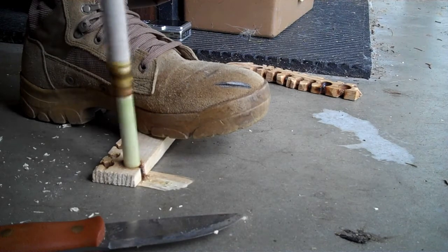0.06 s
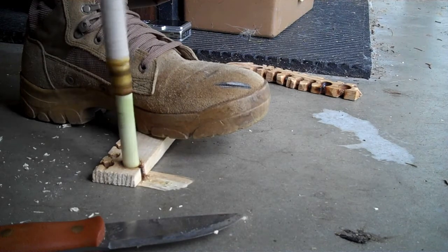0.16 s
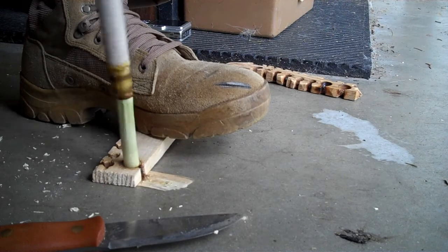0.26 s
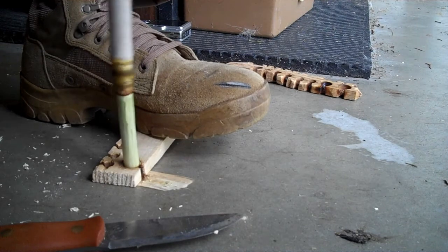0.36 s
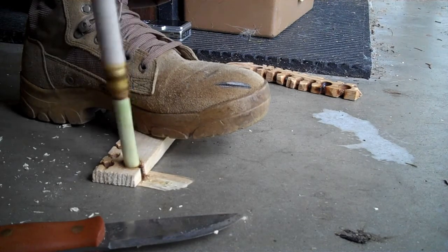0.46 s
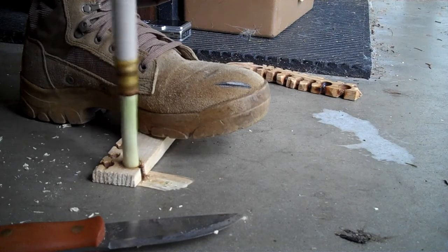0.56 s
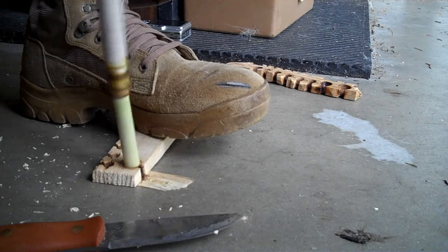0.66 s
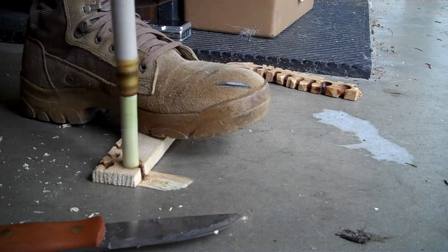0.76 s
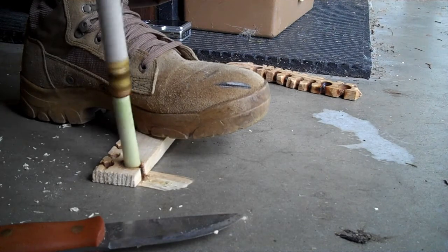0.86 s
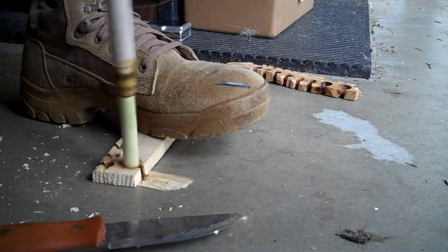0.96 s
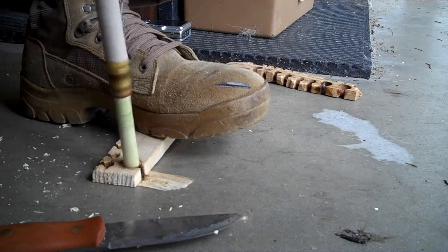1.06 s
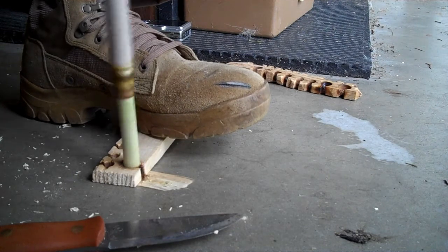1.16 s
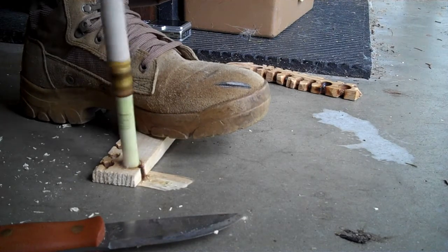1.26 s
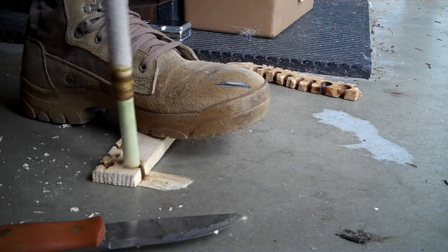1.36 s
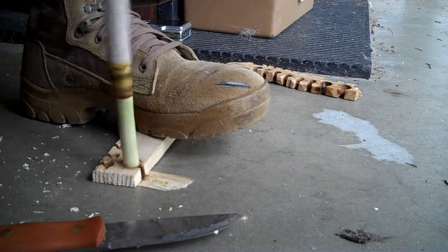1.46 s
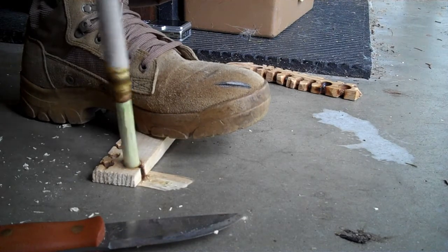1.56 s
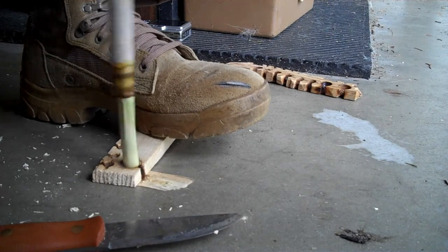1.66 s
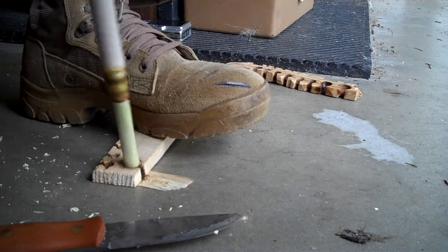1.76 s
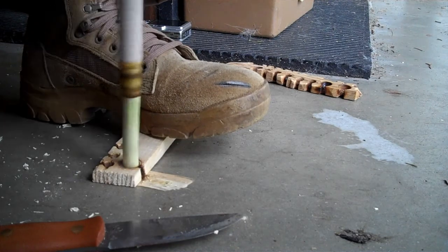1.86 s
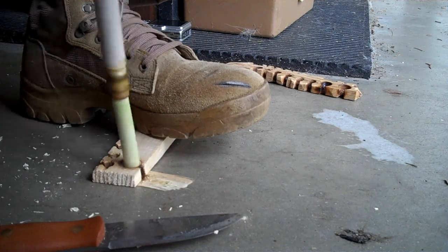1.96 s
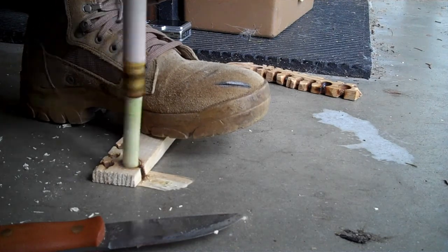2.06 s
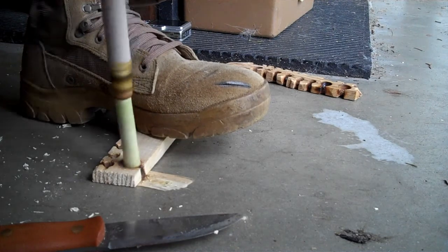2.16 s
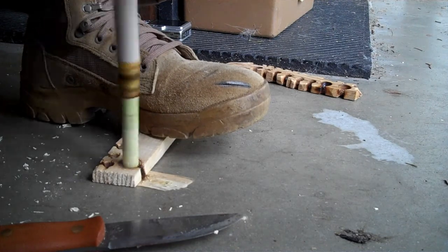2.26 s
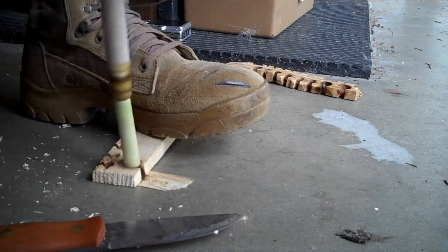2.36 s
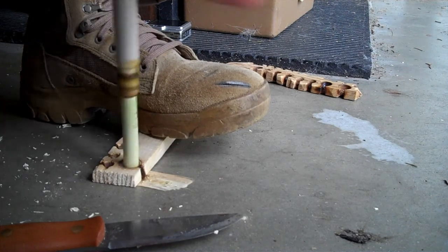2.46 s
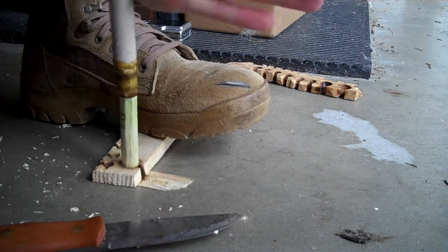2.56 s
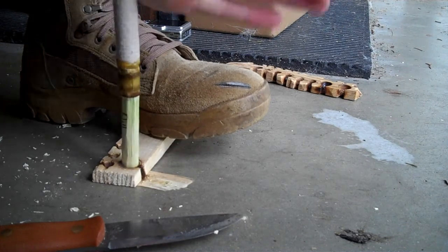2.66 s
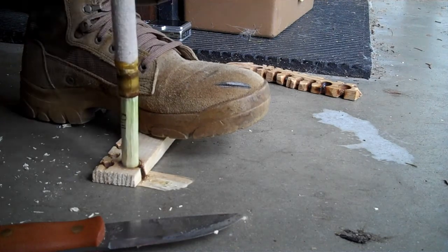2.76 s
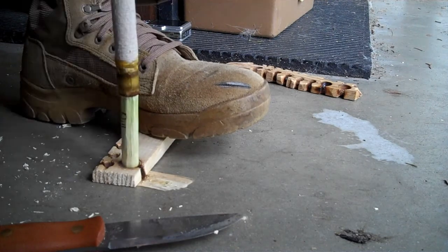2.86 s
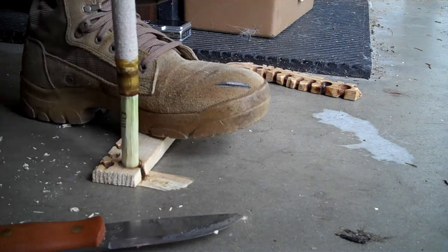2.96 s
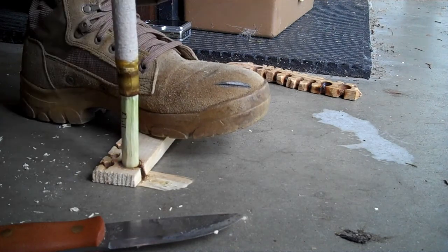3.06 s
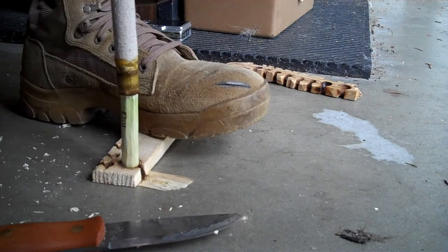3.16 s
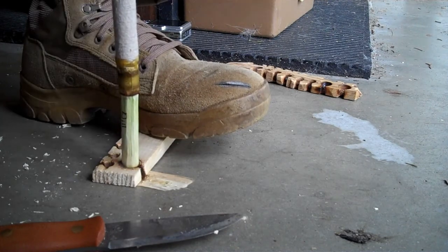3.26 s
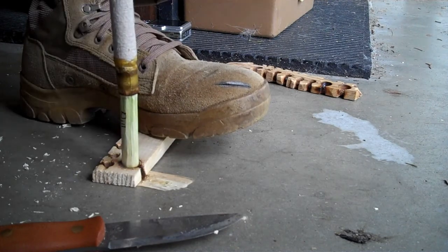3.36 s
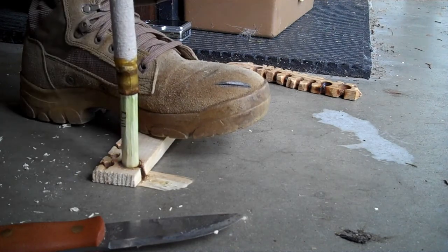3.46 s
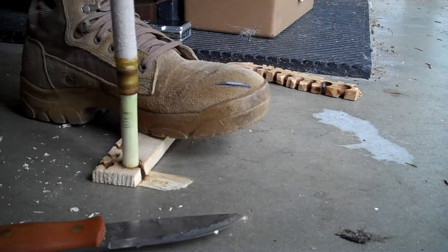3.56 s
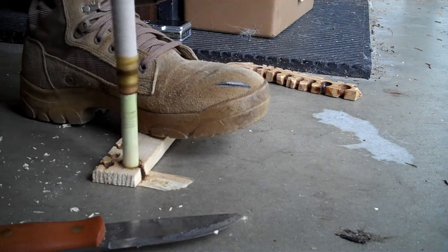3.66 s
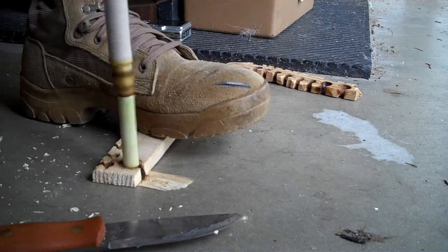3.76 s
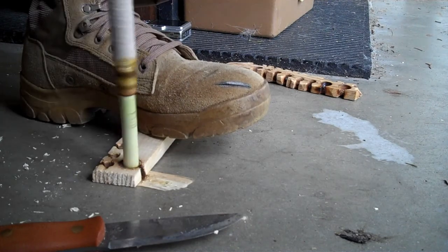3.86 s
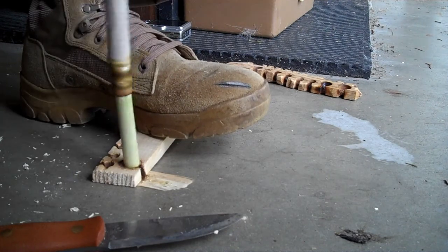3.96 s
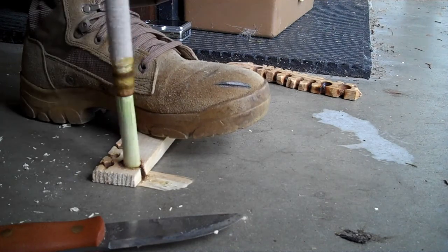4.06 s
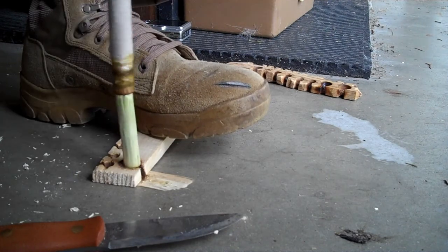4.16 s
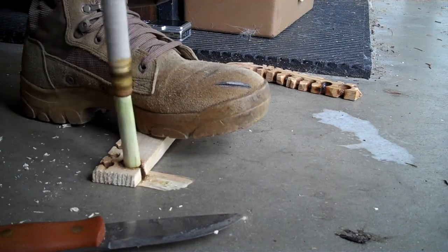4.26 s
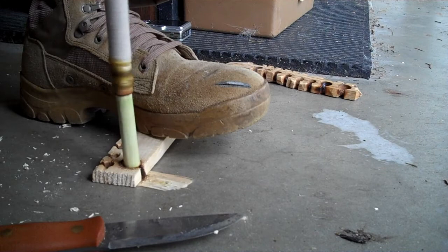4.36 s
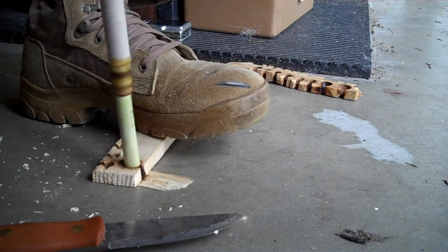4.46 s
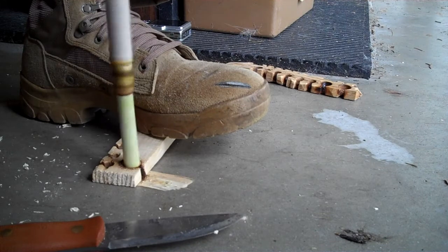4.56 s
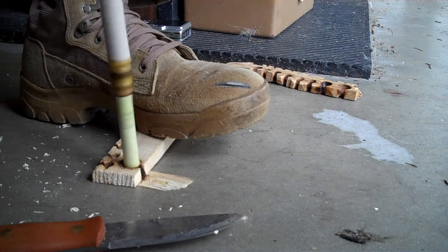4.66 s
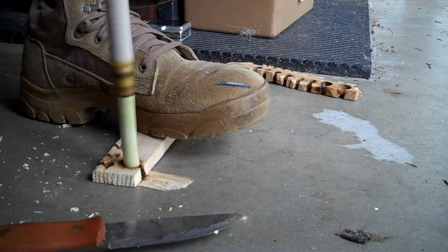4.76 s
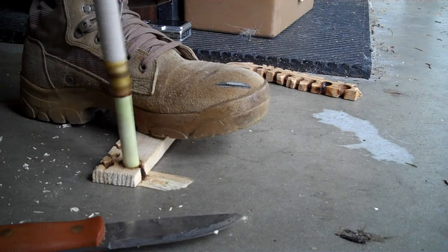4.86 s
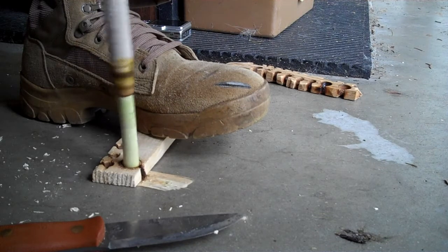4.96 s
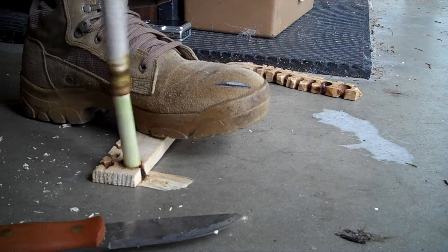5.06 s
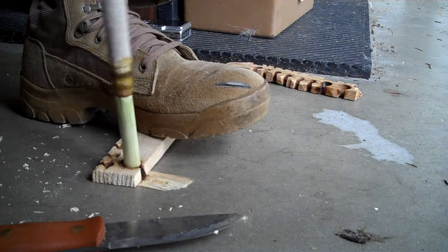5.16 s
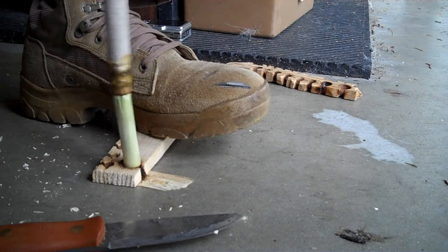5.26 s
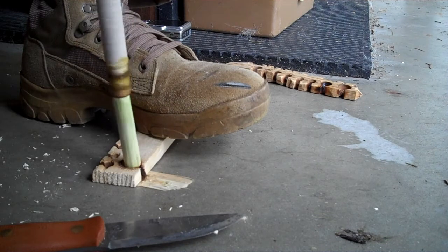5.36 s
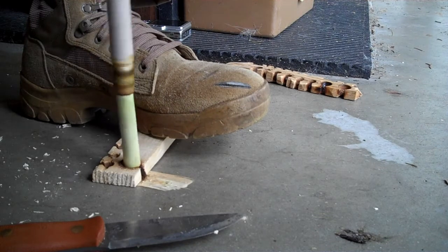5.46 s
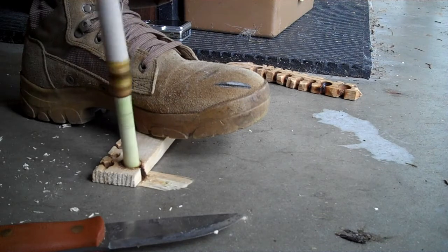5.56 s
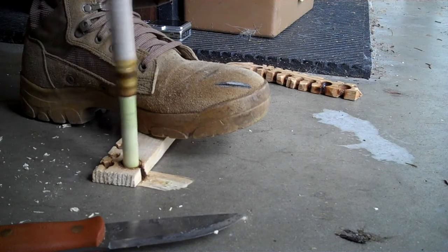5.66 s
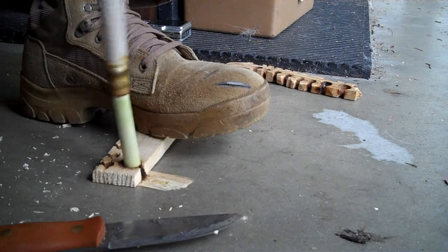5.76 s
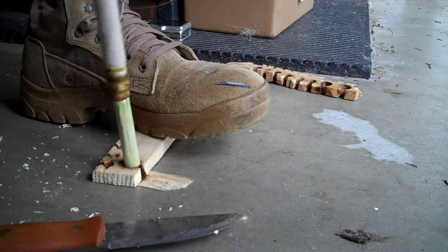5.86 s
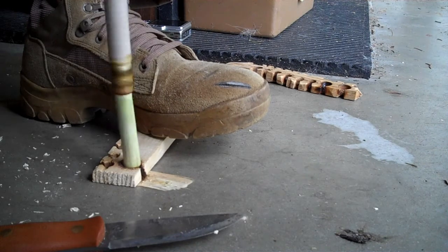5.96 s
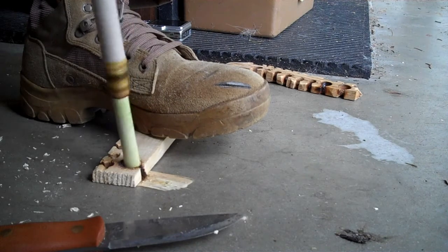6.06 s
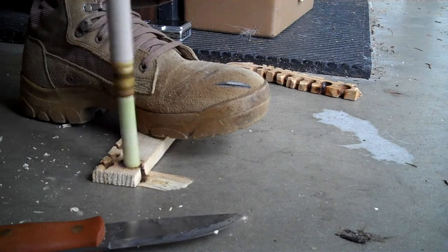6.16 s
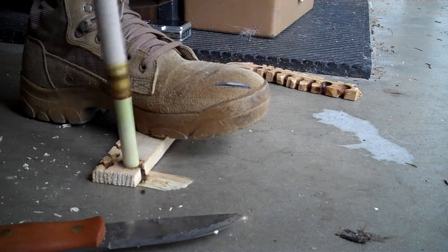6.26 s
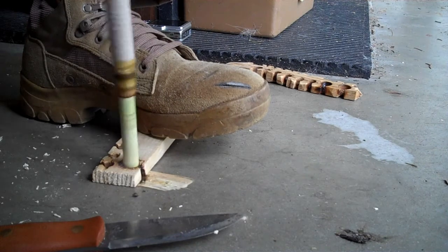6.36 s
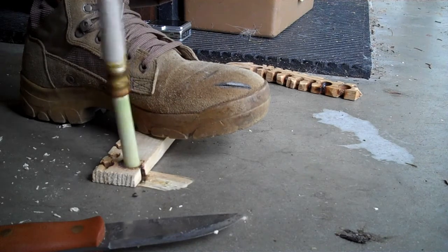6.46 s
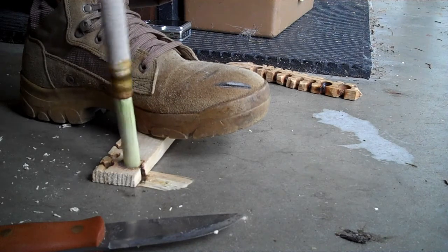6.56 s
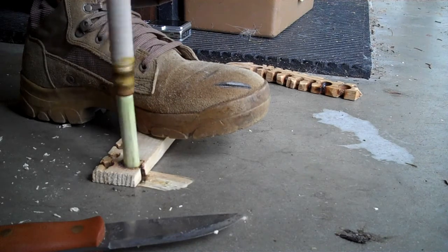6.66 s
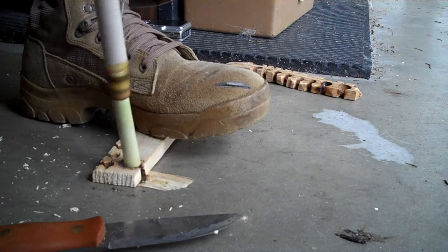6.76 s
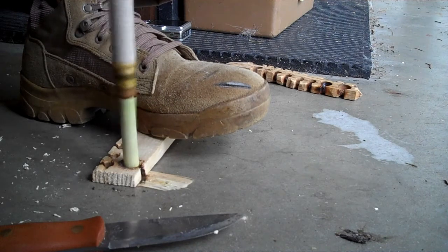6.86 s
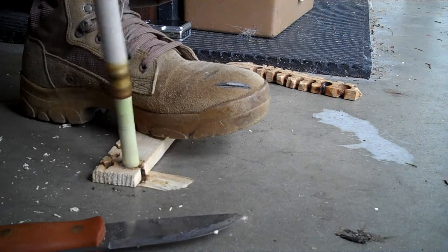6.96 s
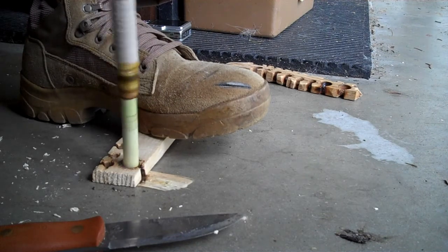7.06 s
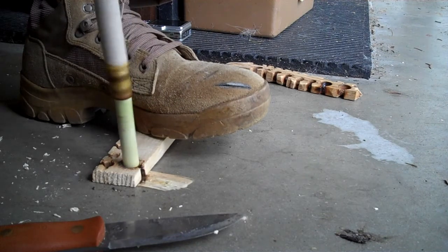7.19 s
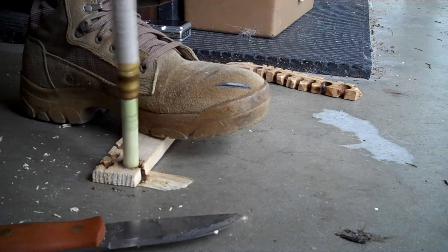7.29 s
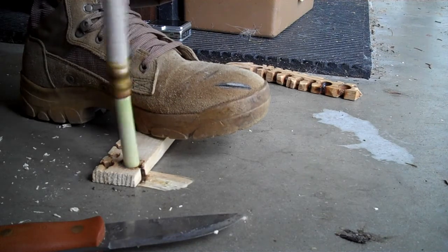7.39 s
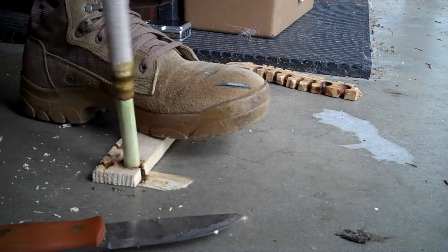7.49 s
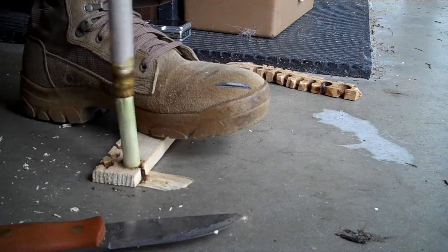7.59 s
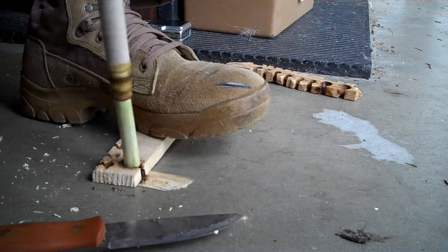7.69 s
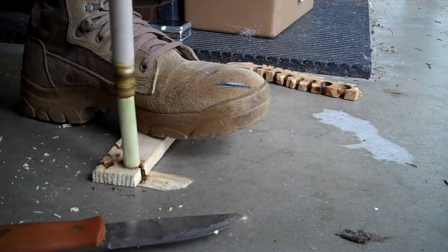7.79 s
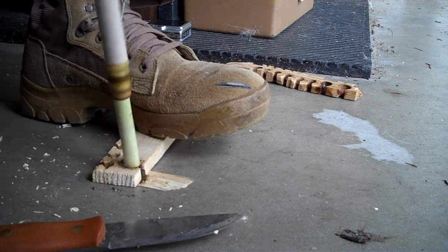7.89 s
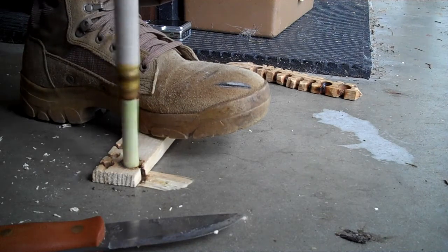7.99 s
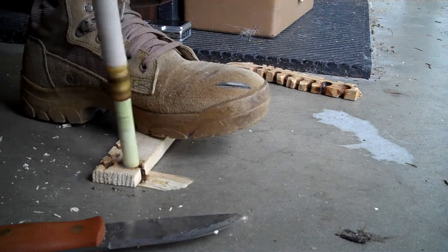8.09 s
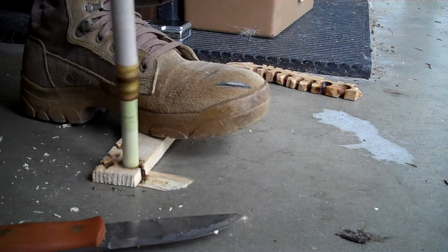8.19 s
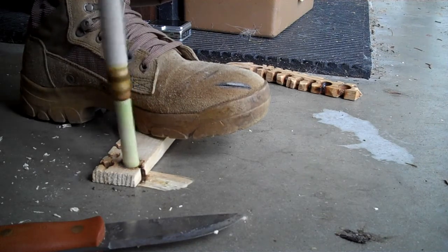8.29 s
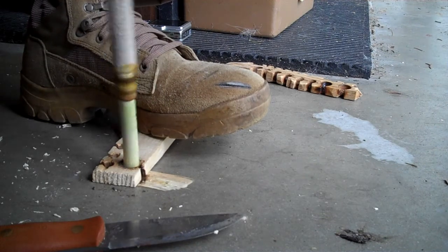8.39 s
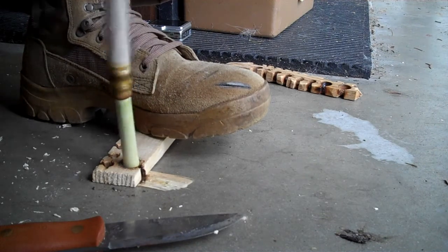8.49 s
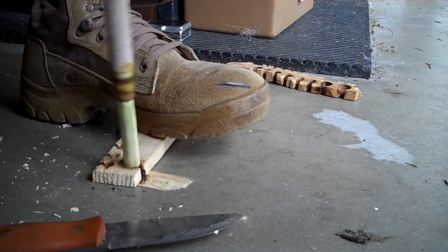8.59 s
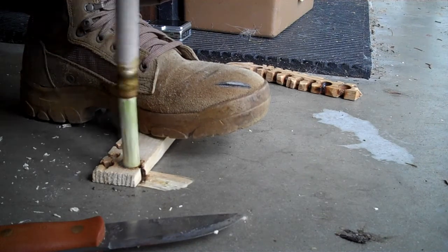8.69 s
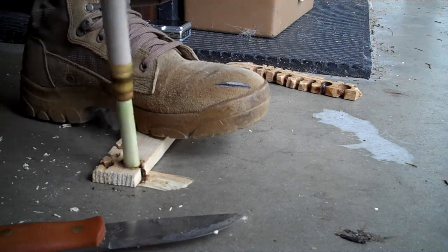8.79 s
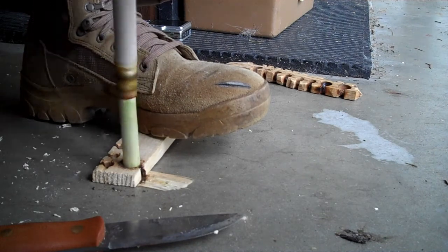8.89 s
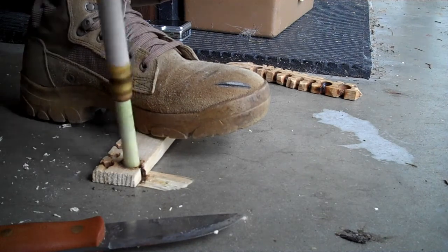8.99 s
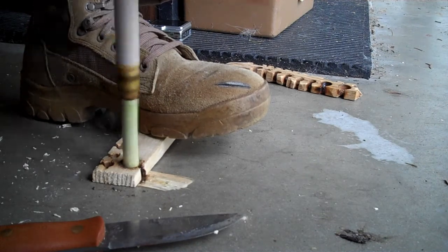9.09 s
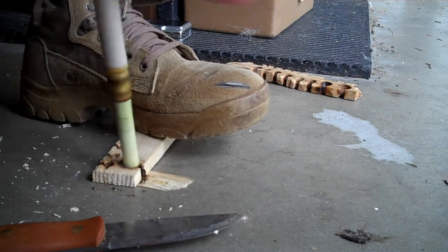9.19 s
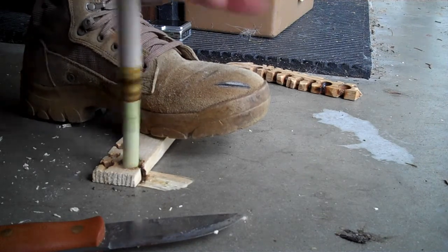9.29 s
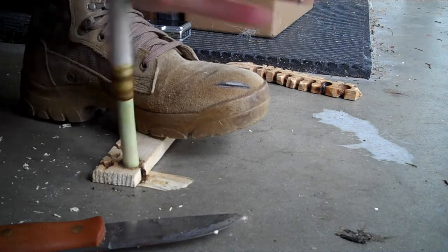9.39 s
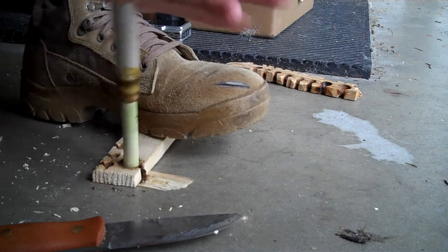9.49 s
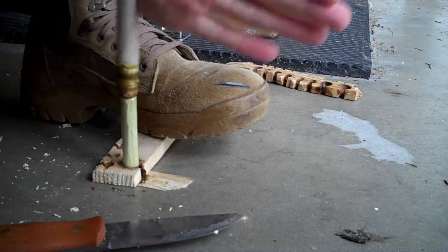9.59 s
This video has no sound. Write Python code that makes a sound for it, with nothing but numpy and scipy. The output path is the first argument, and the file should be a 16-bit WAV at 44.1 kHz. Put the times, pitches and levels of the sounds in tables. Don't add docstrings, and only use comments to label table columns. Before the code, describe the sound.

A wooden spindle rolled between palms rasps back and forth on a small board, ticking sharply, pausing once, outdoors with faint wind.

```python
import sys
import numpy as np
from scipy import signal
from scipy.fft import rfft, irfft, next_fast_len
from scipy.io import wavfile
from scipy.ndimage import uniform_filter1d

SR = 44100
rng = np.random.default_rng(int(sys.argv[2]) if len(sys.argv) > 2 else 0)


def convert_level_to_amplitude(level_db):
    exponent = np.asarray(level_db, float) / 20
    return 10 ** exponent


def wrap_up_sound(samples):
    columns = np.atleast_2d(samples).T
    tamed = np.clip(columns, -1, 1)
    steps = np.round(tamed * 32767).astype(np.int16)
    wavfile.write(sys.argv[1], SR, steps)


N = 424683
TIME = np.arange(N) / SR
PADDED = next_fast_len(N)
BIN_HZ = np.maximum(np.arange(PADDED // 2 + 1) * SR / PADDED, 1)
REST_START_S, REST_END_S = 2.58, 3.65

# t/s, bright level/dB, dull level/dB
SLIDE = [
    (2.55, -71, -60),
    (2.66, -47, -55),
    (2.8, -37.5, -43.5),
    (2.93, -37, -47),
    (2.97, -31, -43),
    (3.0, -37, -43),
    (3.08, -43, -60),
    (3.2, -51, -61),
    (3.6, -56, -49),
]
# t/s, tick peak level/dB, out stroke level/dB, back stroke level/dB
FIRST_BOUT = [(-0.102, -93, -76, -26.5), (0.116, -6, -25, -27), (0.3436, -8.5, -26.5, -27),
              (0.5634, -1.5, -26, -27.5), (0.78, -3, -24.5, -28.5), (0.998, -4, -26, -28),
              (1.2122, -2.5, -27, -29), (1.4229, -2.5, -28, -30.5), (1.6407, -8, -29, -30.5),
              (1.858, -9, -28.5, -29), (2.079, -78, -27, -30.5), (2.29, -74, -27.5, -28.5),
              (2.494, -80, -31, -72)]
SECOND_BOUT = [(3.56, -84, -72, -33), (3.707, -14, -27, -26.5), (3.923, -80, -26, -26),
               (4.145, -91, -26, -27.5), (4.365, -88, -27.5, -27.5), (4.581, -80, -28, -26),
               (4.792, -88, -27, -27), (5.02, -75, -27, -27), (5.238, -77, -27.5, -27),
               (5.452, -4, -28, -29), (5.698, -1.5, -27, -27), (5.9436, -2.5, -27.5, -30),
               (6.1761, -1, -28.5, -27.5), (6.405, -3, -29.5, -30), (6.6344, -2.5, -29.5, -30.5),
               (6.873, -2.5, -29.5, -32.5), (7.106, -6.5, -33, -32), (7.339, -1.5, -30, -31.5),
               (7.563, -1.5, -31, -33), (7.784, -7, -31, -32.5), (8.0096, 0, -32, -31.5),
               (8.2301, -3, -31, -33), (8.45, -1, -32.5, -33.5), (8.6722, -10, -32, -32.5),
               (8.896, -82, -30.5, -32.5), (9.111, -88, -32.5, -32), (9.331, -18, -30.5, -35),
               (9.548, -74, -34, -72)]
# t/s, board over palms level/dB, low ring level/dB, dull part of ticks level/dB
BEARING = [(0, -0.5, -1.5, -8), (0.4, -0.5, 1.5, -18), (1.2, -4, 4.5, -24), (1.5, -.5, 2, -15),
           (2.0, -0.5, 1.5, -6), (2.6, -2, -5, -7), (3.6, -4, 0.5, -12), (4.0, -3.5, 3, -21),
           (4.6, -2.5, -1, -32), (5.3, -4, 3.5, -17), (5.9, -1.5, 0.5, -18), (6.25, -2, -0.5, -27),
           (6.6, 1, -3, -18), (7.2, 0, 2, -13), (7.7, -0.5, 5.5, -18), (8.2, -4, 6, -7), (8.7, 0.5, -3, -9),
           (9.63, -1, 1, -14)]


def rms_one(x):
    return x / np.sqrt(np.mean(x ** 2) + 1e-20)


def in_time(rows):
    s, *columns = np.transpose(rows)
    return [np.interp(TIME, s, c, left=-120, right=-120) for c in columns]


def over_hz(points):
    hz, level_db = np.transpose(points)
    return convert_level_to_amplitude(np.interp(np.log(BIN_HZ), np.log(hz), level_db))


def coloured(x, points):
    gain = over_hz(points) * (BIN_HZ > points[0][0])
    return rms_one(irfft(rfft(x, PADDED) * gain, PADDED)[:, :N])


def noise(points):
    return coloured(rng.standard_normal((2, N)), points)


def drift(rate):
    r = np.exp(-32 * np.pi * rate / SR)
    slow = signal.lfilter([1], [1, -2 * r, r * r], rng.standard_normal(N // 16 + 2002))[2000:]
    return np.interp(np.arange(N) / 16, np.arange(len(slow)), rms_one(slow))


def resonance(x, hz, width_hz):
    r = np.exp(-np.pi * width_hz / SR)
    poles = [1, -2 * r * np.cos(2 * np.pi * hz / SR), r * r]
    return signal.lfilter([(1 - r * r) / 2, 0, (r * r - 1) / 2], poles, x)


def grains(per_s, spread_db):
    strength_db = spread_db * np.minimum(rng.exponential(1, (2, N)), 5)
    sizes = convert_level_to_amplitude(strength_db) * rng.choice([-1, 1], (2, N))
    return rms_one(sizes * (rng.random((2, N)) < per_s / SR))


def half_rolls():
    # turn back t/s, out ring f/Hz, level/dB, back ring f/Hz, level/dB
    first_grips = [(0.003, 2900, -8.0, 2940, -1), (0.22, 2850, 1, 2770, 1.5), (0.445, 2770, 2.6, 2870, 2),
                   (0.667, 2770, 1.0, 2760, 3), (0.878, 2720, 2, 2700, 2), (1.099, 2810, -1.5, 2900, 1),
                   (1.313, 2900, -1, 2930, 1), (1.526, 2960, -0.9, 2810, 0), (1.743, 2920, -0.5, 2830, 0),
                   (1.965, 2900, -1, 3330, -1), (2.176, 3140, -5, 3390, -3.5), (2.384, 3190, -3, 3240, -7),
                   (2.612, 2700, -3, 2690, 0)]
    second_grips = [(3.593, 2850, -6, 2740, 2.5), (3.803, 2730, -3, 2880, 1.5),
                    (4.017, 2860, 2.3, 2970, 1.5), (4.238, 2920, -1.5, 2920, 0.5),
                    (4.459, 2910, -1.5, 2870, -0.5), (4.672, 2900, 0, 3230, -3),
                    (4.895, 2700, 1.5, 3330, -6.5), (5.119, 2650, 1, 3250, -6), (5.333, 2640, 1, 3270, -3),
                    (5.563, 2800, -0.5, 2870, -3), (5.817, 2640, -1, 2900, -4), (6.06, 2970, -5, 2900, 0.5),
                    (6.289, 3480, 1, 2900, -1), (6.517, 2920, -1, 2830, 0), (6.755, 2900, -0.5, 2930, -0.5),
                    (6.986, 2700, -1.3, 2800, 1.7), (7.215, 2800, 1.5, 2710, -0.5),
                    (7.446, 2580, 0, 2920, -1.5), (7.673, 2780, -17, 2880, 1), (7.892, 3000, -2, 2890, 1),
                    (8.116, 2900, 3, 3000, 1.2), (8.335, 2930, 5.5, 2950, 3), (8.557, 2970, 0, 3370, -4.5),
                    (8.78, 2750, -1.5, 3320, -6.5), (8.991, 2930, -7, 3330, -9.2),
                    (9.218, 3230, -6, 2920, -4), (9.437, 3300, -16, 2720, -0.4),
                    (9.615, 2540, -2, 2850, -8.0)]
    tick_lag_s, last_round_s = 0.0044, 0.195
    fastest_out, fastest_back = 0.55, 0.49
    ring_swing = 1.7
    rows = []
    for bout, grips in ((FIRST_BOUT, first_grips), (SECOND_BOUT, second_grips)):
        turns = np.array(bout)[:, 0] - tick_lag_s
        ends = np.append(turns[1:], turns[-1] + last_round_s)
        for turn, end, (_, _, out_db, back_db), grip in zip(turns, ends, bout, grips):
            out_share = np.clip((grip[0] - .002 - turn) / (end - turn), .4, .54)
            back = turn + out_share * (end - turn)
            rows.append((turn, out_db, fastest_out, *grip[1:3]))
            rows.append((back, back_db, fastest_back, *grip[3:]))
    start, palm_db, fastest, ring_hz, ring_db = np.transpose(rows)
    s, board_db, _, _ = np.transpose(BEARING)
    rasp_db = palm_db + np.interp(start, s, board_db)
    return np.column_stack([start, rasp_db, palm_db, fastest, ring_hz, ring_swing * ring_db])


def per_stroke(rows, axis):
    return rows[np.searchsorted(rows[:, 0], TIME, side="right") - 1, axis]


def speed(strokes, sharpness, grip, sag_db):
    bite_s, slip_db, bite_db, bite_fade_s = .024, 0, 4, 0.016
    first_bite_share = 0.43
    start, fastest = strokes[:, 0], np.clip(strokes[:-1, 3], .2, .8)
    peaks = start[:-1] + fastest * np.diff(start)
    marks = np.append(np.column_stack([start[:-1], peaks]).ravel(), start[-1])
    quarter = np.interp(TIME, marks, np.arange(len(marks)))
    late = np.where(quarter % 2 < 1, 1.1, 1)
    since = TIME - per_stroke(strokes, axis=0) - bite_s
    jolt_db = np.where(since < 0, slip_db, bite_db * np.exp(-np.maximum(since, 0) / bite_fade_s))
    jolt_db = jolt_db * np.where(TIME < REST_START_S, first_bite_share, 1)
    swing = np.abs(np.sin(np.pi / 2 * quarter)) ** (sharpness * late)
    gripped = np.tanh(grip * late * swing) / np.tanh(grip * late)
    return convert_level_to_amplitude(jolt_db + sag_db * (1 - quarter % 2)) * gripped


def board(strokes):
    # f/Hz, width/Hz, level/dB
    modes = [(1431, 580, -4.5), (1500, 450, -8), (2310, 133, -4), (2330, 207, -2), (3233, 370, -10.5),
             (4030, 404, -1), (4083, 780, 0)]
    tears = grains(per_s=5000, spread_db=2.1) * convert_level_to_amplitude(1.16 * drift(42))
    fixed = np.zeros((2, N))
    for k, (hz, width_hz, db) in enumerate(modes):
        ring = resonance(tears, hz, width_hz) / np.sqrt(width_hz)
        fixed += convert_level_to_amplitude(db + 1.4 * drift(19.6)) * ring * (-1) ** k
    moving = np.zeros((2, N))
    for row, after in zip(strokes[1:], strokes[2:]):
        part = slice(max(round(row[0] * SR), 0), round(after[0] * SR))
        moving[:, part] = convert_level_to_amplitude(row[5]) * resonance(tears[:, part], hz=row[4], width_hz=223)
    low_db = in_time(BEARING)[1] - 7.0 + 2.55 * drift(15.7)
    low_ring = convert_level_to_amplitude(low_db) * rms_one(resonance(tears, hz=1994, width_hz=250))
    rings = rms_one(fixed) + convert_level_to_amplitude(-1.0 + 2.2 * drift(31)) * rms_one(moving) - low_ring
    small = signal.sosfilt(signal.butter(2, 1000, "high", fs=SR, output="sos"), rings)
    spin = 0.23 + speed(strokes, sharpness=2.73, grip=1.25, sag_db=-1.0)
    stroke = convert_level_to_amplitude(per_stroke(strokes, axis=1) - 1.5) * spin
    return (stroke + convert_level_to_amplitude(in_time(SLIDE)[1])) * rms_one(small)


def palms(strokes):
    # f/Hz, level/dB per Hz
    skin = [(2350, -8), (4000, -5.5), (4730, -5), (5920, 1), (6580, -1.5), (7150, -2.5), (7770, -2.5),
            (8560, -11), (9430, -12), (11400, -20), (14900, -53), (22000, -120)]
    # f/Hz, width/Hz, level/dB
    shaft = [(5740, 370, -18.5), (6200, 370, -16.5), (6660, 140, -13.5), (7170, 160, -14.5)]
    rub = coloured(grains(per_s=9000, spread_db=1.3), skin)
    flares = sum(convert_level_to_amplitude(db + 5.4 * drift(32)) * rms_one(resonance(rub, hz, w)) for hz, w, db in shaft)
    rub = rms_one(rub + flares) * convert_level_to_amplitude(1.4 * drift(43))
    spin = 0.3 + speed(strokes, sharpness=3.1, grip=2.35, sag_db=0.0)
    stroke = convert_level_to_amplitude(per_stroke(strokes, axis=2) - 1.63) * spin
    return (stroke + convert_level_to_amplitude(in_time(SLIDE)[0])) * rub


def collar(strokes):
    # t/s, peak level/dB, dull part level/dB
    snaps = [(0.1431, -19, -12), (0.354, -16, -17), (0.3711, -15, -6), (2.078, -16, -18), (3.8535, -8, -10),
             (4.357, -23, -18), (5.3627, -19, -10), (5.578, -17, -12), (5.597, -16, -12), (5.815, -14, -16),
             (7.3662, -16, -8), (8.0391, -16, -5), (0.6862, -13, -15), (0.8063, -16, -9), (2.1027, -14, -5),
             (3.6132, -7, -26), (3.6215, -16, -19), (3.7289, -17, -16), (3.936, -7, -15), (4.0417, -14, -7),
             (4.1577, -7, -18), (4.2687, -24, -4), (4.292, 0, -26), (4.3823, -7, -15), (4.5037, -4, -18),
             (4.596, -8, -17), (4.8167, -9, -20), (4.9187, -9, -10), (4.9325, -2, -24), (5.0425, -11, -12),
             (5.1533, -9, -8), (5.258, -8, -14), (5.4784, -17, -19), (5.8413, -7, -18), (5.8558, -4, -29),
             (6.094, -2, -31), (6.2382, -5.5, -8), (6.319, -15, -14), (6.5476, -12, -16), (7.0106, -8, -21)]
    lucks = rng.standard_normal(99)
    slack = [(row[0] + 0.022, row[2] + 6 + 2.1 * luck, -12) for row, luck in zip(strokes[1:-1], lucks)]
    s, *_, dull_db = np.transpose(BEARING)
    rounds = [*FIRST_BOUT[1:], *SECOND_BOUT]
    turns = [(at, db, np.interp(at, s, dull_db)) for at, db, _, _ in rounds]
    ticks = [*turns, *snaps, *slack]
    bright, dull = np.full((2, 2, N), 1e-18)
    fade = np.exp(-np.arange(300) / SR / .0018)
    for (s, peak_db, dull_db), burst in zip(ticks, rng.standard_normal((len(ticks), 2, 300))):
        at = round(s * SR)
        blow = 0.19 * burst * fade
        dull[:, at:at + 300] += convert_level_to_amplitude(peak_db + dull_db + 11.0) * blow
        dull[0, at + 9] += convert_level_to_amplitude(peak_db + dull_db + 2.0)
        blow[:, [0, 7, 13]] = np.outer([1, .5 * np.sign(burst[1, 0])], [.3, .55, .8])
        bright[:, at:at + 300] += convert_level_to_amplitude(peak_db + 11.5) * blow
    return (convert_level_to_amplitude(-4.0) * resonance(bright, hz=5280, width_hz=1150) - resonance(bright, hz=6890, width_hz=1330)
            + convert_level_to_amplitude(-11.5) * resonance(bright, hz=9240, width_hz=2300) + resonance(dull, hz=3000, width_hz=900)
            + convert_level_to_amplitude(-9.5) * resonance(bright, hz=3830, width_hz=1800))


def squeaks():
    # t/s, length/s, start f/Hz, end f/Hz, level/dB
    glides = [(1.097, 0.085, 1298, 1370, -41), (1.25, .15, 1330, 1350, -51),
              (1.43, 0.15, 1130, 1152, -41.5), (1.56, 0.11, 1176, 1120, -52), (1.671, .05, 1394, 1340, -46),
              (6.499, 0.04, 1305, 1225, -33), (6.446, 0.07, 1385, 1380, -43), (6.572, .04, 1266, 1270, -41),
              (6.64, 0.067, 1250, 1280, -44), (6.685, .15, 1340, 1320, -48), (7.358, 0.28, 1500, 1500, -46),
              (8.063, 0.1, 1270, 1016, -40), (8.088, .09, 1079, 1040, -39), (8.15, 0.071, 922, 894, -43),
              (8.268, .1, 1310, 1207, -46), (8.33, .06, 1178, 1110, -43), (8.45, 0.1, 1330, 1300, -45),
              (8.229, 0.1, 1050, 1087, -48), (8.284, 0.12, 887, 893, -44),
              (8.467, 0.097, 1110, 1074, -41.5), (8.853, 0.091, 1070, 960, -44),
              (8.948, 0.068, 695, 620, -38.5), (8.729, 0.033, 1310, 1140, -37), (8.88, .08, 637, 700, -47),
              (9.325, 0.1, 864, 860, -41.5), (9.495, 0.11, 898, 836, -41.5)]
    out, waver_hz, rough = np.zeros(N), 15 * drift(31), 0.7 + .35 * drift(75)
    for s, length, start_hz, end_hz, level_db in glides:
        span = slice(round(s * SR), round((s + length) * SR))
        part = (TIME[span] - s) / length
        turns = np.cumsum(start_hz + (end_hz - start_hz) * part + waver_hz[span]) / SR
        out[span] += convert_level_to_amplitude(level_db + 4) * np.sin(np.pi * part) * np.sin(2 * np.pi * turns)
    echo_fade = np.exp(-np.arange(9000) / SR / 0.08)
    echoes = rng.standard_normal((2, 9000)) * echo_fade * convert_level_to_amplitude(-44)
    echoes[0, 0] = 1
    return signal.fftconvolve(out[None] * rough, echoes)[:, :N]


def gust_db():
    # peak t/s, peak level/dB, hold/s
    puffs = [(0, -45, 0.016), (0.276, -48, .01), (0.373, -39, 0.018), (0.857, -45, .02), (1.1, -56, 0.24),
             (1.547, -60, 0.16), (1.875, -45, 0.13), (2.063, -53, .06), (2.497, -46, .01),
             (2.718, -47, .03), (2.887, -45, 0.037), (3.077, -45.5, .01), (3.257, -43, .01),
             (3.358, -47, 0.042), (3.708, -50, 0.13), (3.948, -54, .01), (4.163, -54, 0.15),
             (5.865, -46, 0.18), (6.18, -36, .01), (6.33, -38, .02), (6.595, -47, 0.053),
             (6.877, -53, 0.066), (7.15, -67, 0.16), (7.55, -65, .1), (7.847, -57.5, 0.089),
             (4.6, -74, .03), (5.25, -75, .04), (8.4, -76, 0.036), (9.06, -64, 0.067), (9.31, -59, .01)]
    rise_db_per_s, fall_db_per_s, calm_db = 220, 159, -81
    s, peak_db, hold = np.transpose(puffs)[:, :, None]
    coarse = TIME[::64]
    early = np.maximum(s - hold / 2 - coarse, 0)
    late = np.maximum(coarse - s - hold / 2, 0)
    strongest = np.max(peak_db - rise_db_per_s * early - fall_db_per_s * late, axis=0)
    return np.interp(TIME, coarse, np.maximum(strongest, calm_db))


def wind():
    # f/Hz, level/dB
    spectrum = [(15, -24), (30, -1), (55, 0), (90, 1), (140, -4), (200, -19), (300, -31), (400, -41)]
    common, own = noise(spectrum) * convert_level_to_amplitude(gust_db() + 3.5 * drift(9.5))
    return np.array([convert_level_to_amplitude(-3.5) * (0.7 * common + own), convert_level_to_amplitude(0.5) * (0.8 * common - own)])


def engine():
    # t/s, firing cycle f/Hz, level/dB
    running = [
        (0, 51.1, -61),
        (4.1, 49.86, -62),
        (4.4, 49.55, -54.5),
        (5.3, 50.2, -51),
        (5.6, 49.1, -63),
        (7.5, 41.8, -53),
        (8.4, 43.5, -51),
        (8.9, 47.5, -48.5),
        (9.2, 48, -48),
        (9.64, 49.4, -50),
    ]
    cycle_hz, level_db = in_time(running)
    turns = np.cumsum(cycle_hz) / SR
    orders = [(2, -5.5), (3, -5.5), (4, -2.0)]   # multiple, level/dB
    tones = sum(convert_level_to_amplitude(db + 3 * drift(8.2)) * np.sin(2 * np.pi * k * turns) for k, db in orders)
    return convert_level_to_amplitude(level_db) * tones


def outdoors():
    # f/Hz, level/dB per Hz
    hiss_spectrum = [(1500, -30), (1900, -9), (3780, -11), (4600, -5), (5940, 0), (8500, -12), (11400, -23),
                     (14900, -53)]
    rumble_spectrum = [(160, -21), (280, -1.5), (433, -2.5), (487, -2.5), (631, -2.5), (745, 2), (1050, -2),
                       (1360, -46), (2310, -120)]
    low_spectrum = [(53, -2), (90, -7.5), (194, -2.5), (227, -5.5), (291, -17), (320, -17.5), (420, -14),
                    (700, -120)]
    haze_spectrum = [(900, -49), (1100, -1.5), (1400, -0.5), (1800, -3.0), (2100, -8), (2600, -70)]
    # t/s, level/dB
    stir = [(0, -49), (0.67, -49), (2.04, -45), (2.76, -51), (4.77, -47.5), (6.14, -50), (6.38, -49.5),
            (6.65, -44), (6.95, -48.5), (7.94, -48), (8.42, -41), (8.72, -44), (9.63, -44)]
    haze_db, = in_time(stir)
    rumble_db = -48 + 0.39 * (haze_db - haze_db.mean())
    low = convert_level_to_amplitude(-51 + 1.2 * drift(5.4)) + convert_level_to_amplitude(gust_db() - 9.5)
    hiss = convert_level_to_amplitude(-37.5 + .5 * drift(3)) * noise(hiss_spectrum)
    haze = convert_level_to_amplitude(haze_db) * noise(haze_spectrum)
    return hiss + haze + convert_level_to_amplitude(rumble_db) * noise(rumble_spectrum) + low * noise(low_spectrum)


def ports(rows):
    # f/Hz, level/dB
    side_share = [(6600, -88), (6800, -2), (7500, -2.5), (8400, -6.5), (11500, -4)]
    # f/Hz, level/dB
    left_over_right = [(6600, 0), (6800, 9.5), (7500, 8), (8400, 5), (10500, 2.5), (11500, 8), (12000, -1)]
    # f/Hz, width/Hz, level/dB
    side_patches = [(150, 80, -2), (300, 140, -9), (650, 300, -5), (1250, 200, -2), (2000, 200, -3),
                    (2400, 200, -3), (2850, 250, -3), (5500, 300, -9)]
    common, unlike = rfft(rows, PADDED)
    unlike = unlike * over_hz(side_share)
    tilt = np.sqrt(over_hz(left_over_right))
    patches = np.zeros(N)
    for hz, width_hz, db in side_patches:
        passing = uniform_filter1d(1. * (drift(5) > .9), size=400)
        patches += convert_level_to_amplitude(db) * passing * resonance(resonance(rows[1], hz, width_hz), hz, width_hz)
    resting = (TIME > REST_START_S) & (TIME < REST_END_S)
    middle = signal.butter(6, [1900, 3500], "band", fs=SR, output="sos")
    patches = patches + convert_level_to_amplitude(-4) * resting * signal.sosfilt(middle, rows[1])
    both = irfft(np.array([(common + unlike) * tilt, (common - unlike) / tilt]), PADDED)[:, :N]
    return both + patches * [[1], [-1]]


def scene():
    strokes = half_rolls()
    drill = board(strokes) + palms(strokes) + collar(strokes)
    return ports(drill + squeaks() + outdoors()) + wind() + engine()


def dropouts(x):
    # f/Hz, share of the time (0-1)
    holes = [(250, 0), (450, .28), (650, .15), (900, .04), (1350, .1), (1650, .36), (1950, 0), (8200, 0),
             (8800, .04), (10500, .03), (11300, .15)]
    hz, frames, cells = signal.stft(x, SR, nperseg=2048)
    band = (30 * np.log(1 + hz / 900)).astype(int)
    draws = rng.random((band.max() + 1, len(frames) // 3 + 1))
    chance = draws.repeat(3, axis=1)[band, :len(frames)]
    dropped = chance < np.interp(hz, *np.transpose(holes))[:, None]
    return signal.istft(cells * np.where(dropped, convert_level_to_amplitude(-21), 1), SR, nperseg=2048)[1][:, :N]


def low_pass(x):
    return signal.sosfilt(signal.butter(12, 12670, fs=SR, output="sos"), x)


def record(dry):
    rounded = .95 * np.tanh(dry / .95)
    cut = signal.sosfilt(signal.ellip(10, .5, 50, 11460, fs=SR, output="sos"), rounded)
    return low_pass(dropouts(cut))


dry = scene()
out = record(dry)
wrap_up_sound(out)
```